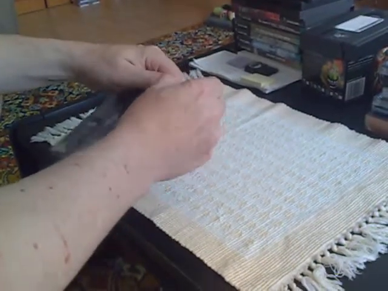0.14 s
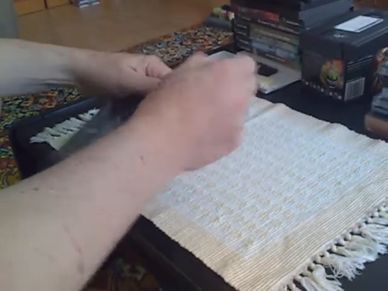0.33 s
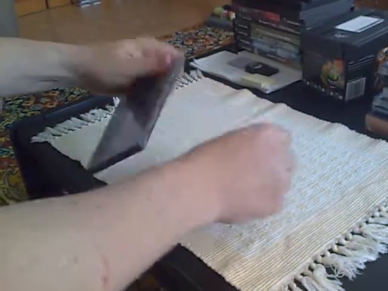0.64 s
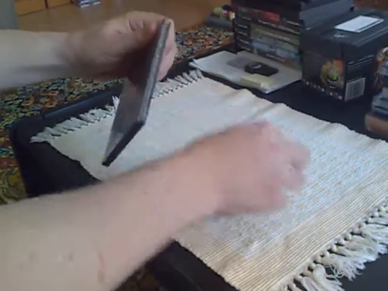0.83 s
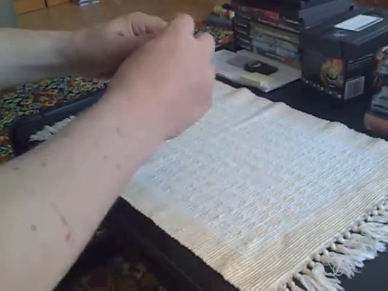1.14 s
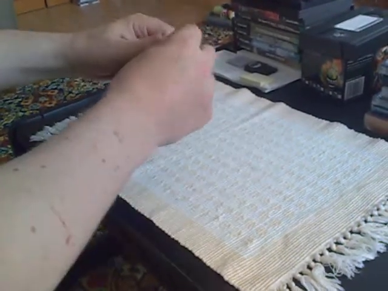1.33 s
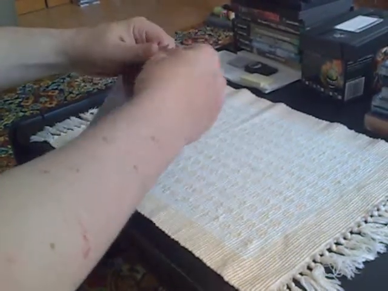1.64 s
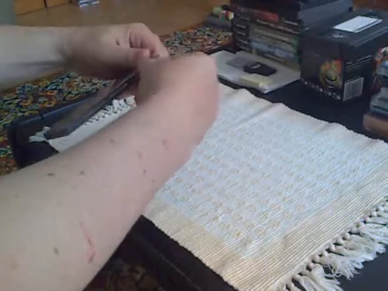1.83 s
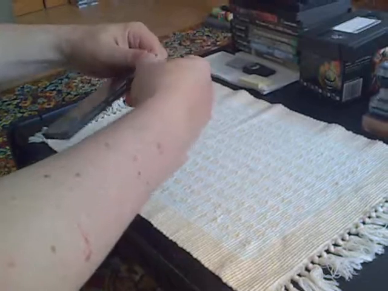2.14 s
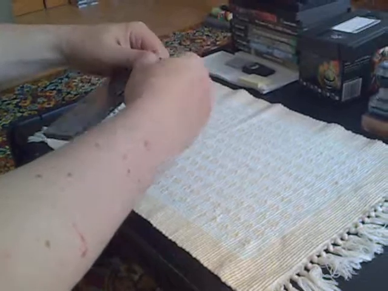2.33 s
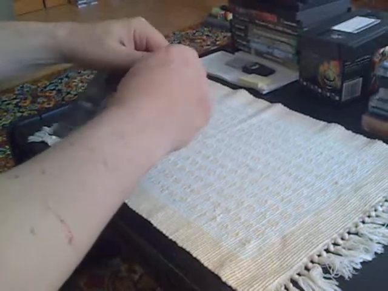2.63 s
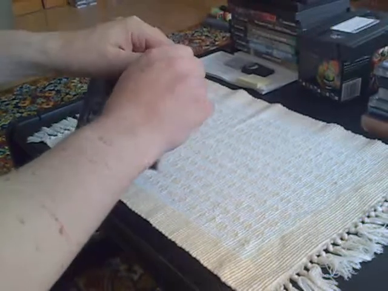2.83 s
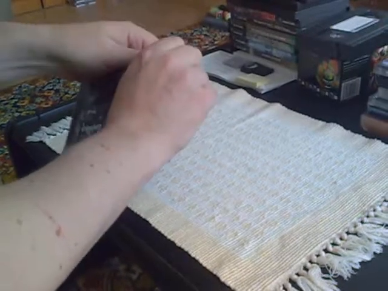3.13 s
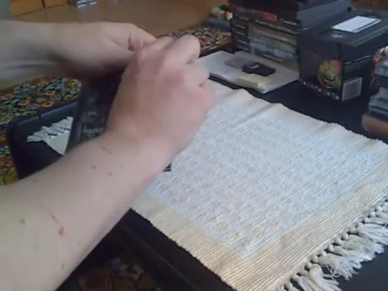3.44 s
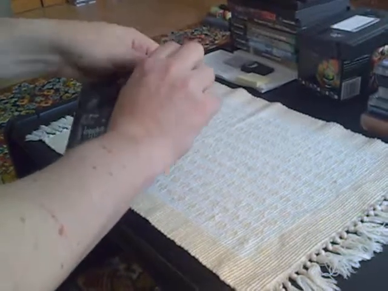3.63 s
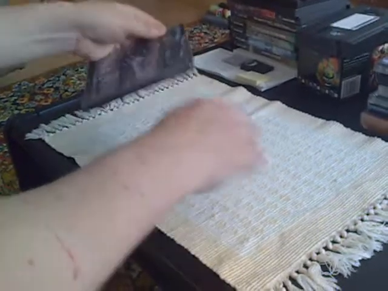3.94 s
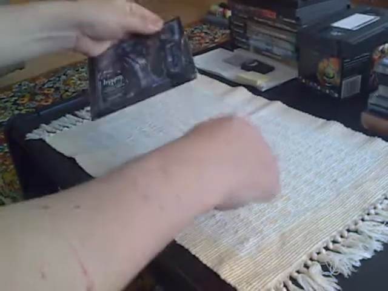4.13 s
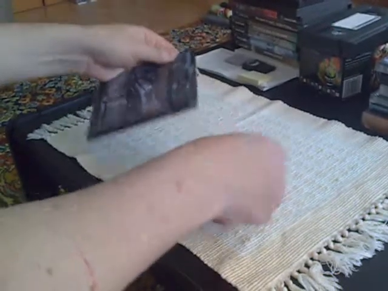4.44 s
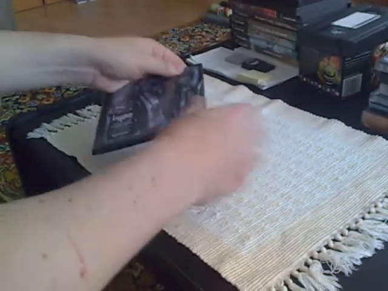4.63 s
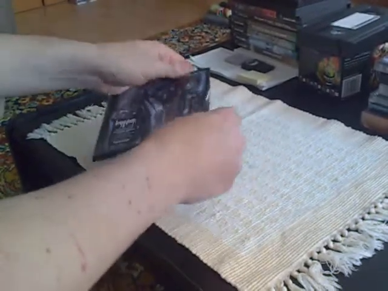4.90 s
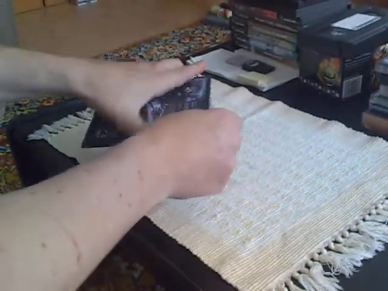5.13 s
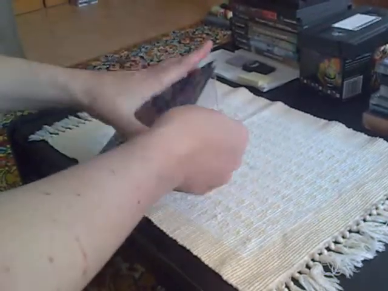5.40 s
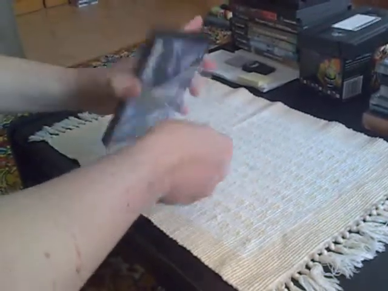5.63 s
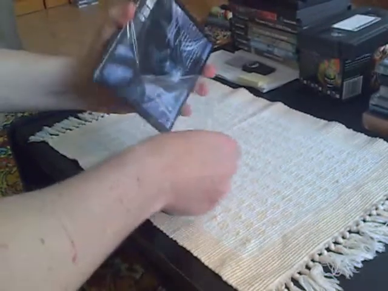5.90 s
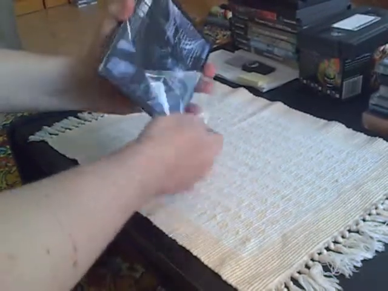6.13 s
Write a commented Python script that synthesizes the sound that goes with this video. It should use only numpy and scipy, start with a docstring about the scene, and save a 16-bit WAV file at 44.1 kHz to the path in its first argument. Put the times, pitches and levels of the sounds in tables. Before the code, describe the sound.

Close to the microphone in a small furnished room, thin plastic film crackles sharply as fingers work it loose from a disc case. After a quieter stretch of dull bumps and light rubbing, more snaps build into a crinkling peel, followed by a short hollow clack of the case. One loud snap and a flurry of tearing crackles follow, thinning to small ticks. A faint rumble and hiss lie underneath.

```python
"""Two hands pick the shrink wrap off a plastic disc case, close up in a small furnished room.
Over low rumble and hiss, the taut film buckles in a first cluster of snaps; soft hand bumps and faint
rubs follow. From 2.5 s it snaps again, then crinkles as it peels, and the case knocks hardest at 4.3 s.
The loudest snap comes at 5.5 s, ahead of a dense run of tearing and a few last ticks.
Throughout, a near surface answers each snap and the room rings briefly."""
import sys
import numpy as np
from scipy import signal
from scipy.fft import rfft, irfft
from scipy.io import wavfile

SR = 44100
rng = np.random.default_rng(int(sys.argv[2]) if len(sys.argv) > 2 else 0)


def file_out(sig):
    """Save sig as 16-bit WAV at sys.argv[1]."""
    # one column per channel
    cols = np.atleast_2d(sig).T
    # limit, then scale
    lim = np.clip(cols, -1, 1)
    pcm = np.round(lim * 32767).astype(np.int16)
    wavfile.write(sys.argv[1], SR, pcm)


N = 276066

# the film's four registers, body, middle, edge and sparkle:
# (low [Hz], high [Hz], lag [s], decay [multiple of the snap's own], buckle over slips [dB])
REGISTERS = [(323, 1310, 0.00087, 1.6, -1.5), (1556, 2980, 0.00014, 1.1, -3),
             (3390, 7850, 0.00011, 1.2, -9), (7300, 21600, .00005, 1.05, 1)]


def undb(db):
    """Decibels to gain."""
    return 10 ** (np.asarray(db) / 20)


def unit(x):
    """Scale to rms 1."""
    return x / np.sqrt(np.mean(x ** 2) + 1e-20)


def unit_energy(x):
    """Scale each row to energy 1."""
    return x / np.linalg.norm(x, axis=-1, keepdims=True)


def add(track, s, sound):
    """Mix a sound into a track from time s on."""
    i = max(int(s * SR), 0)
    part = sound[:max(len(track) - i, 0)]
    track[i:i + len(part)] += part


def band(x, low_hz, high_hz, order=3):
    """Causal band-pass."""
    edges_hz = [low_hz, min(high_hz, SR / 2 - 1000)]
    return signal.sosfilt(signal.butter(order, edges_hz, "band", fs=SR, output="sos"), x)


def resonate(x, hz, width_hz):
    """One resonance, gain 1 at its centre."""
    return signal.lfilter(*signal.iirpeak(hz, hz / width_hz, SR), x)


def room_tone(noise_db=-47):
    """The bed: low rumble, even hiss and a faint hum that wavers."""
    # still room and microphone hiss: (frequency [Hz], relative spectral level [dB])
    spectrum = [(20, 1.5), (45, 5.5), (70, -4.5), (120, -8.5), (160, -12.5), (300, -13.5), (420, -19.5),
                (950, -21.5), (2200, -25), (6000, -30), (9500, -31.5), (14500, -26.5), (16000, -25.5)]
    # hum partials: (frequency [Hz], rms level before the waver [dB])
    hum = [(81, -61.5), (120, -72.5), (236, -73)]
    hz, db = np.transpose(spectrum)
    freqs = np.maximum(np.fft.rfftfreq(N, 1 / SR), 1)
    colour = undb(np.interp(np.log(freqs), np.log(hz), db))
    air = irfft(rfft(rng.standard_normal(N)) * colour, N)
    out = undb(noise_db) * unit(air)
    t = np.arange(N) / SR
    for hum_hz, hum_db in hum:
        drift = np.interp(t, np.linspace(0, t[-1], 20), rng.standard_normal(20))
        out += undb(hum_db) * np.sqrt(2) * (1 + drift) * np.sin(2 * np.pi * hum_hz * t + drift)
    return out


def room_tail(x, tail_db=-11.5, predelay_s=.011, t60_low=0.23, t60_high=0.16, split_hz=3800, treble_db=1):
    """The furnished room gives a short diffuse tail whose treble dies first."""
    out, t = np.zeros(N), np.arange(SR // 4) / SR
    lowpass = signal.butter(2, split_hz, fs=SR, output="sos")
    # the hands keep moving, so each moment meets its own pattern of reflections
    hop = SR // 10
    for i in range(0, N - hop, hop):
        noise = rng.standard_normal(len(t))
        low = signal.sosfiltfilt(lowpass, noise)
        low_tail = low * 1000 ** (-t / t60_low)
        high_tail = undb(treble_db) * (noise - low) * 1000 ** (-t / t60_high)
        piece = x[i:i + 2 * hop]
        grain = piece * signal.windows.cosine(len(piece))
        wet = signal.fftconvolve(grain, unit_energy(low_tail + high_tail))
        add(out, i / SR + predelay_s, undb(tail_db) * wet)
    return out


def hand_bumps(scuff_db=-13, scuff_top_hz=480):
    """Fingers land softly: a brief low thump and a dull scuff of skin."""
    # soft landings: (time [s], level [dB], pitch [Hz], decay [s])
    landings = [(0.54, -29.5, 117, 0.0038), (0.99, -43, 96, 0.0049), (2.534, -40, 138, 0.0097),
                (3.704, -32.5, 87, 0.0062), (5.511, -36, 196, 0.0089), (5.773, -35.5, 88, 0.011)]
    out, t = np.zeros(N), np.arange(SR // 8) / SR
    for start, db, hz, decay_s in landings:
        push = 2 * t / decay_s * np.exp(1 - 2 * t / decay_s)
        thump = np.sin(2 * np.pi * hz * t)
        scuff = unit(band(rng.standard_normal(len(t)), hz, scuff_top_hz, order=2))
        add(out, start, undb(db) * push * (thump + undb(scuff_db) * scuff))
    return out


def case_knocks(attack_s=0.00045, detune=.006):
    """The hollow plastic case rings in a few short modes, a little differently under each grip."""
    # blows on the case: (time [s], level [dB])
    blows = [(3.2956, -40.5), (4.232, -39), (4.2607, -34), (4.2874, -24), (4.546, -51)]
    # modes of the case: (frequency [Hz], level relative to the blow [dB], t60 [s])
    modes = [(303, -5, 0.096), (610, -16, 0.12), (826, -17, .07), (1060, -7, 0.12), (1400, 10, 0.012),
             (1527, 1, 0.022), (1755, -2.5, 0.03)]
    out, t = np.zeros(N), np.arange(SR // 4) / SR
    attack = 1 - np.exp(-t / attack_s)
    for start, db in blows:
        for hz, mode_db, t60 in modes:
            pitch = hz * (1 + detune * rng.standard_normal())
            ring = np.sin(2 * np.pi * (pitch * t + rng.random())) * 1000 ** (-t / t60)
            add(out, start, undb(db + mode_db) * ring * attack)
    return out


def film_ring(x, tension=1, ring_db=0):
    """The film and the air beneath it ring along with whatever excites them; tension shifts the pitch."""
    # film stretched on the case: (frequency [Hz], width [Hz], gain before ring_db is added [dB])
    resonances = [(960, 134, 21.5), (2510, 380, 0), (3680, 2100, -3), (9750, 660, 11)]
    return x + sum(undb(db + ring_db) * resonate(x, hz * tension, width) for hz, width, db in resonances)


def film_crinkle(top_creases_per_s=730, halving_db=9, crease_s=0.00091, scatter_db=4, rub=0.87):
    """Crowds of small creases pop at random, over the steady rasp of film dragged across plastic."""
    # the film slides and crumples: (start [s], end [s], level [dB], brightness [dB per register])
    strokes = [(0.719, 0.841, -66.5, 2), (1.525, 1.666, -72, 0), (3.138, 3.205, -65, -10),
               (3.477, 3.514, -63.5, 1), (3.751, 3.793, -44.5, -1), (3.801, 3.933, -50.5, -0.5),
               (3.921, 4.065, -47, -2.5), (4.05, 4.215, -61, 1), (4.225, 4.3, -53, -11.5),
               (4.492, 4.543, -55.5, -3.5), (4.981, 5.088, -60.5, 0), (5.263, 5.36, -61.5, 0.5),
               (5.67, 5.79, -56, -12), (5.821, 5.914, -60, 0.5), (6.128, 6.247, -56, -1)]
    # tonal balance of a stroke: (body [dB], middle [dB], edge [dB], sparkle [dB])
    balance_db = [-5.5, 4, 3, 1.5]
    out = np.zeros(N)
    pop = np.exp(-np.arange(SR // 100) / SR / crease_s)
    hardest_db = np.transpose(strokes)[2].max()
    steps_from_middle = np.arange(len(REGISTERS)) - 1
    for start, end, db, tilt_db in strokes:
        # a faster pull is louder and pops more creases
        rate = top_creases_per_s * 2 ** ((db - hardest_db) / halving_db)
        n = max(int((end - start) * SR), len(pop))
        sizes = undb(scatter_db * np.minimum(rng.exponential(size=n), 3))
        creases = signal.fftconvolve(sizes * (rng.random(n) < rate / SR), pop)[:n]
        grip = (unit(creases) + rub) * signal.windows.tukey(n, 0.18)
        sheet = film_ring(grip * rng.standard_normal(n), ring_db=-32)
        rasp = undb(5) * resonate(sheet, hz=2330, width_hz=450)
        levels_db = db + np.array(balance_db) + tilt_db * steps_from_middle
        for (low_hz, high_hz, *_), level_db in zip(REGISTERS, levels_db):
            add(out, start, undb(level_db) * unit(band(sheet + rasp, low_hz, high_hz)))
    return out


def film_snaps(rise_s=0.00061, buckle_s=.0007, shiver_db=-22, shiver_stretch=5, coupling=0.31):
    """Each snap is one buckle inside a burst of tiny slips. Gives (direct sound, room send)."""
    # the film buckles or tears: (time [s], middle level [dB], brightness [dB per register],
    # body relative to middle [dB], slack [0 taut to 1 loose])
    snaps = [(0.2069, -43.5, -2.5, -3.5, 0.81), (0.3215, -48.5, 2.5, -18, 1), (0.334, -26, -4, -3.5, 0.64),
             (0.3416, -24.5, 4, -22, 0.73), (0.3664, -39.5, 0.5, 6.5, 0.64), (0.662, -48, -9, -21, 0.44),
             (1.579, -51.5, -5.5, 0.5, 0.62), (2.515, -57.5, 9.5, -2, .8), (2.58, -21.5, -3, -5.5, 0.52),
             (2.733, -43, 2.5, 5, .35), (2.7365, -32, 1, -3.5, 0.71), (2.8222, -49.5, 6.5, -15, .7),
             (2.8434, -38.5, 5, -8, 0.68), (2.921, -48.5, 1, -4, .9), (3.298, -42, -4, -7, .85),
             (3.602, -45.5, -8.5, -21, 1), (3.7447, -47.5, 9, -5, .5), (3.7918, -40, 3, -9, .5),
             (3.8422, -35.5, 4.5, -3.5, .3), (3.8483, -50, 10, -15, .2), (3.8636, -47, 8, -9, .45),
             (3.9092, -41, -3, -17, .7), (3.9319, -28, -7, -11, 0.93), (3.9488, -42, 5, -21, .45),
             (3.9607, -39, -4, -17, .45), (4.2586, -37, 3.5, -4.5, .3), (4.286, -32, 4, 3, .4),
             (4.5434, -28, -15, -8, .03), (4.9724, -57.5, 9, 0, .65), (5.009, -55, 6.5, -6, 0.95),
             (5.028, -46, 1, -8, .2), (5.0716, -44.5, -8, -7, 0.26), (5.3825, -37, 6.5, -3.5, 0.89),
             (5.4536, -23.5, 4, -1, 0.76), (5.5098, -18, -4, -5, 0.7), (5.6585, -32, -3, -7, 0.9),
             (5.682, -36, 2, -1.5, .9), (5.7011, -37, -9, -2, 0.35), (5.708, -35.5, -8, -5, .2),
             (5.7297, -31.5, 1.5, 0, 0.82), (5.747, -35, 2.5, -14, 1), (5.7691, -32, 1, -8, 0.85),
             (5.7852, -45, 8.5, -18, 0.46), (5.801, -35.5, 4.5, -6, 0.081), (5.9737, -49, 5.5, -2, .8),
             (6.1388, -44.5, 2, -6, 1), (6.156, -43, 4.5, -6, 0.11), (6.2011, -46, 8, -9, 0.51)]
    times, level_db, tilt_db, body_db, slack = np.transpose(snaps)
    t = np.arange(SR // 30) / SR
    tensions = np.exp(rng.uniform(-.03, .03, len(times)))
    # taut film gives a short dry tick; a loose sheet sounds for longer and throws more into the room
    decay_s = np.interp(slack, (0, 1), (0.00089, .0018))
    sends_db = np.interp(slack, (0, 1), (-6.5, 5.5))
    # only the big snaps move enough film to ring the whole sheet
    rings_db = coupling * (level_db - level_db.max())
    attack = 1 - np.exp(-t / rise_s)
    buckle = signal.unit_impulse(len(t), int(buckle_s * SR))
    colours_db = (body_db, 0, tilt_db, 2 * tilt_db)
    direct, send = np.zeros(N), np.zeros(N)
    for (low_hz, high_hz, lag_s, stretch, buckle_db), colour_db in zip(REGISTERS, colours_db):
        # a sharp release, then the loose sheet shivers on
        age = t / (stretch * decay_s[:, None])
        release = (1 + age) * np.exp(-age) + undb(shiver_db) * np.exp(-age / shiver_stretch)
        slips = unit_energy(np.sign(rng.standard_normal(age.shape)) * release * attack)
        pushes = slips + undb(buckle_db) * buckle
        gains = undb(level_db + colour_db) * np.sqrt(.005 * SR)  # the energy of that rms held for 5 ms
        # low bending waves are slow, so the body comes late
        for i, start in enumerate(times + lag_s):
            burst = film_ring(pushes[i], tensions[i], rings_db[i])
            add(direct, start, gains[i] * unit_energy(band(burst, low_hz, high_hz)))
            # the room hears all directions at once: the slips average out, leaving the film's colour
            spread = film_ring(buckle, tensions[i], rings_db[i])
            add(send, start, gains[i] * undb(sends_db[i]) * unit_energy(band(spread, low_hz, high_hz)))
    return direct, send


def scene(echo_s=.0096, echo_db=-15):
    """Film, case and hands up front, one early reflection off a near surface, and the room behind."""
    snaps, snap_send = film_snaps()
    handling = film_crinkle() + case_knocks() + hand_bumps()
    near = snaps + handling
    out = near + room_tail(snap_send + handling) + room_tone()
    add(out, echo_s, undb(echo_db) * near)
    return out[None]


def record(dry, top_hz=15950):
    """A steep low-pass trims the highest treble."""
    return signal.sosfilt(signal.ellip(10, .2, 70, top_hz, fs=SR, output="sos"), dry)


dry = scene()
out = record(dry)
file_out(out)
```